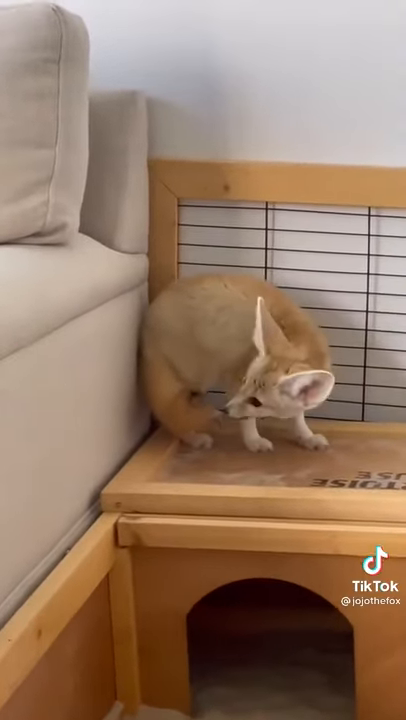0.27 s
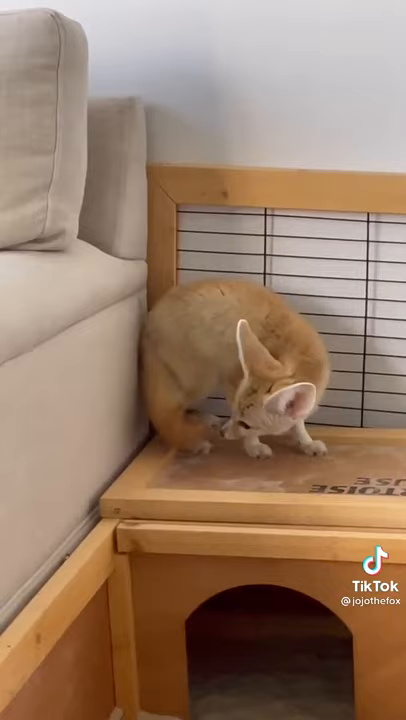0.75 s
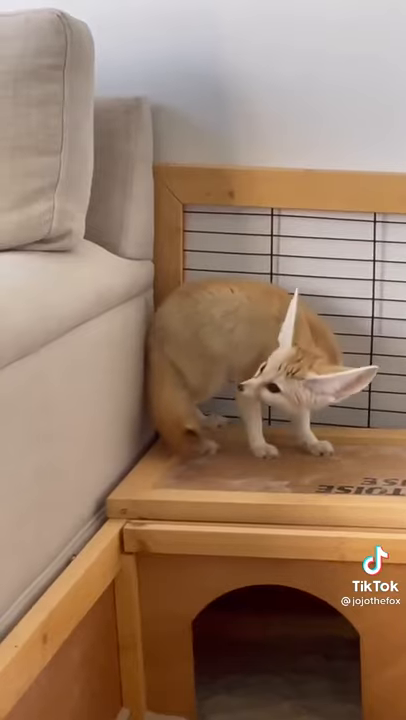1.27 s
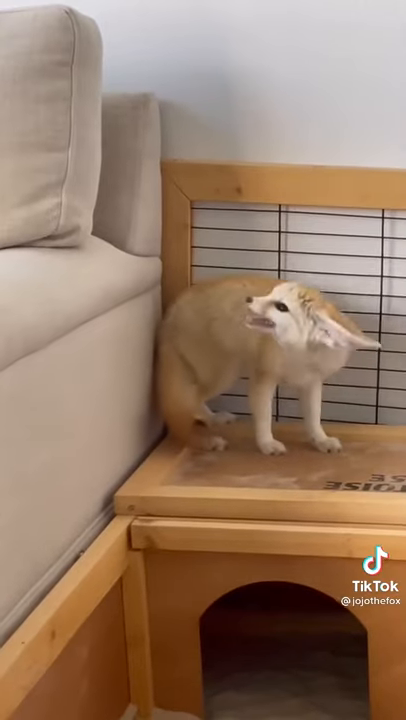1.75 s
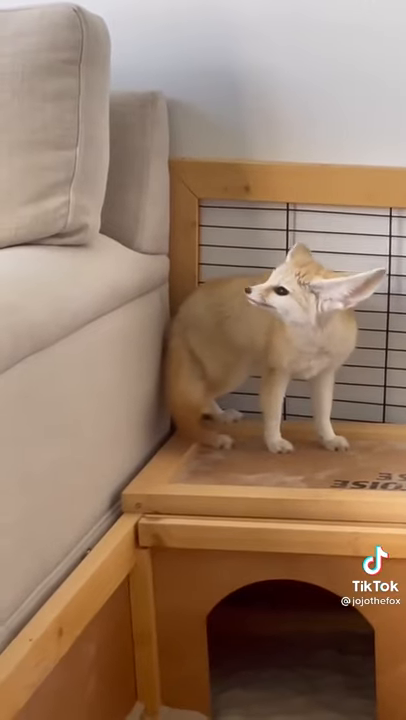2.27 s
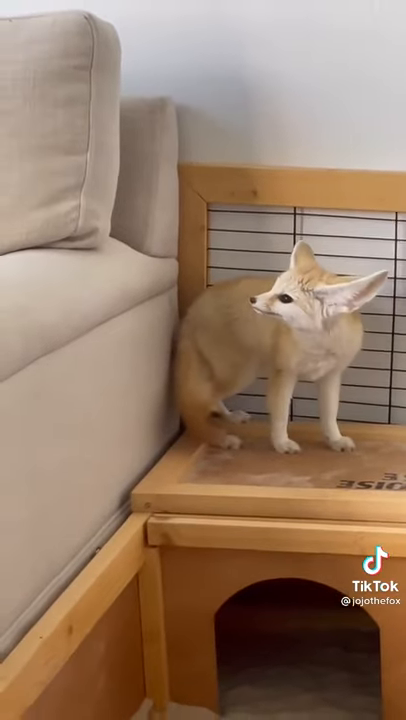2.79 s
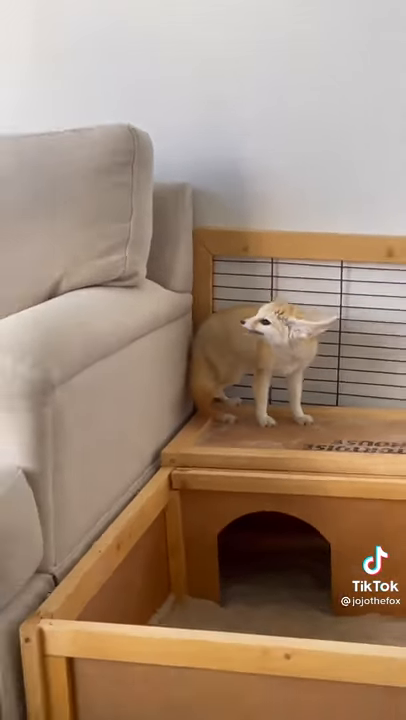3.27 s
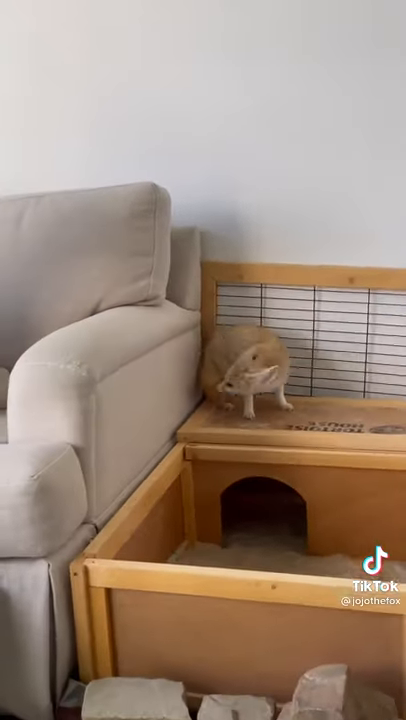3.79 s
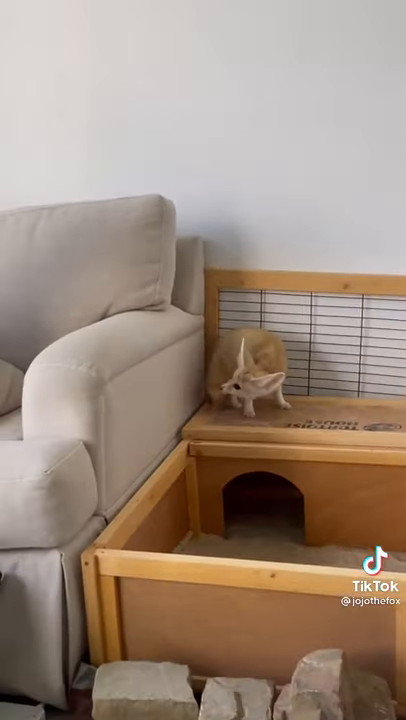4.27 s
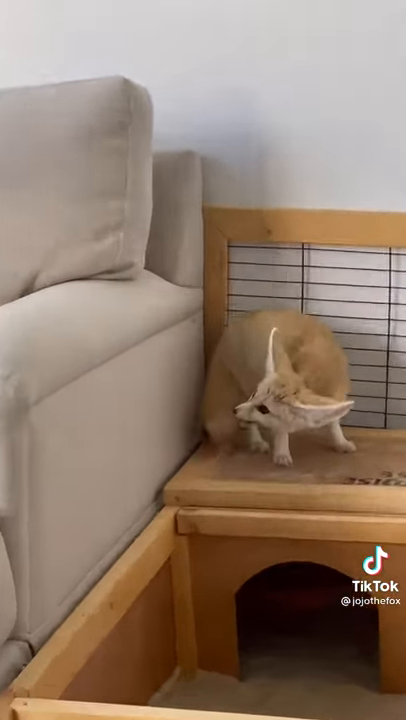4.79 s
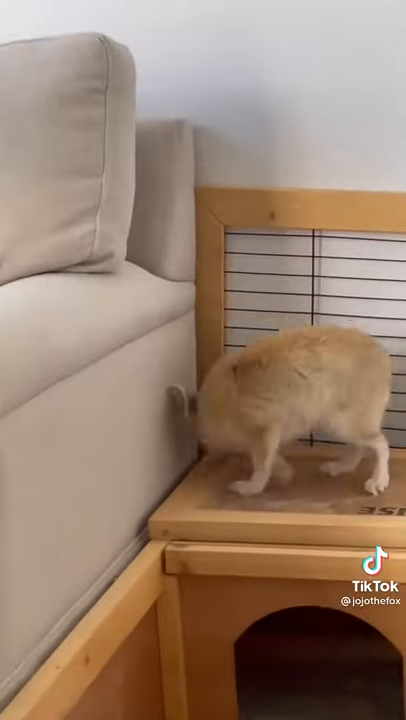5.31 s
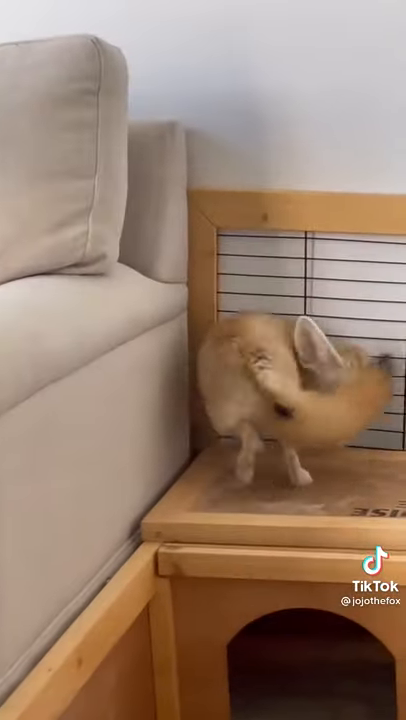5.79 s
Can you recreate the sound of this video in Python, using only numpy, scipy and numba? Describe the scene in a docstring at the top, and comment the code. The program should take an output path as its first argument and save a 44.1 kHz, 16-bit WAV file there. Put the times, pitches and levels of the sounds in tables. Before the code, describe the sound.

In a furnished living room, a small fox gives thin, closed-mouth whines that sink to a growl, then rises into a harsh screech. After a pause comes a much louder, rattling shriek, then a third hoarse one, a few soft paw thumps on a wooden lid, and wavering whines. A phone a metre or two away catches short room echo, low rumble and hum.

```python
"""Fennec fox on a hutch

In a living room a fennec fox on a wooden hutch whines, growls and breaks into three harsh screeches.
One larynx makes all of it: harmonics of the folds, nearly clean in the whines, jittered and roughened
in the screeches, where noisy slaps rattle the throat. Resonances stand for mouth, throat and hollow lid.
A phone with two microphone ports a metre or two away hears it with room echo, hum and low rumble."""
import sys
import numpy as np
from scipy import signal
from scipy.fft import rfft, irfft, next_fast_len
from scipy.io import wavfile
from scipy.ndimage import uniform_filter1d
from numba import njit

SR = 44100
rng = np.random.default_rng(int(sys.argv[2]) if len(sys.argv) > 2 else 0)


def unload_wav(signal):
    """Save mono or channel-first audio to the path in sys.argv[1] as 16-bit WAV at rate SR, clipped to [-1, 1]."""
    wavfile.write(
        sys.argv[1],
        SR,
        np.round(np.clip(np.atleast_2d(signal).T, -1, 1) * 32767).astype(np.int16),
    )


N = 266805
T = np.arange(N) / SR
TOP_HZ = 14800  # top of the phone's range
ATTACK_S, RELEASE_S = .012, .026  # sloped edges of a call


def undb(db):
    """Decibels to gain."""
    return 10 ** (np.asarray(db) / 20)


def unit(x):
    """Scale to rms 1."""
    return x / np.sqrt(np.mean(x ** 2))


def curves(rows):
    """Each column after the time column, interpolated to every sample."""
    s, *columns = np.transpose(rows)
    return [np.interp(T, s, c) for c in columns]


def noise():
    """White noise."""
    return rng.standard_normal(N)


def colour(x, points):
    """Filter by a spectrum of (Hz, dB) points, joined on a logarithmic frequency axis."""
    hz, db = np.transpose(points)
    size = next_fast_len(2 * N)
    f = np.maximum(np.fft.rfftfreq(size, 1 / SR), 1)
    gain = undb(np.interp(np.log(f), np.log(hz), db))
    return irfft(rfft(x, size) * gain, size)[:N]


def band(x, lo_hz, hi_hz):
    """Steep band-pass without delay."""
    sos = signal.butter(4, [lo_hz, min(hi_hz, .45 * SR)], "band", fs=SR, output="sos")
    return signal.sosfiltfilt(sos, x)


def ring(x, hz, width_hz):
    """One resonance, gain 1 at its centre."""
    return signal.lfilter(*signal.iirpeak(hz, hz / width_hz, fs=SR), x)


@njit
def glide(x, hz, width_hz):
    """A resonance whose centre moves, gain 1 at its centre."""
    y, band_state, low_state = np.empty(len(x)), 0., 0.
    for i in range(len(x)):
        g, damping = np.tan(np.pi * hz[i] / SR), width_hz / hz[i]
        v = (band_state + g * (x[i] - low_state)) / (1 + g * (g + damping))
        band_state = 2 * v - band_state
        low_state = low_state + 2 * g * v
        y[i] = damping * v
    return y


def wander(hz):
    """Random motion, mostly slower than hz, rms 1."""
    return unit(signal.sosfilt(signal.butter(2, hz, fs=SR, output="sos"), noise()))


def bump(s, spread_s):
    """A smooth bell-shaped swell centred on time s."""
    return np.exp(-.5 * np.minimum(((T - s) / spread_s) ** 2, 60))


def during(start, end, attack_s, release_s):
    """1 between start and end, with sloped edges."""
    return np.clip(np.minimum((T - start) / attack_s, (end - T) / release_s) + .7, 0, 1)


def per_call(calls, index):
    """One column of a table of calls, held through each call."""
    held = np.full(N, float(calls[0][index]))
    for row in calls:
        held[T > row[0] - 2 * ATTACK_S] = row[index]
    return uniform_filter1d(held, size=700)


def call_levels(calls, end_power):
    """Each call moves from start to crest to end: level in dB, on-off gate, time since its start."""
    level, gate, age = np.full(N, -100.), 0, np.zeros(N)
    for start, crest, end, start_db, crest_db, end_db, *_ in calls:
        to_crest = np.clip((T - start) / (crest - start), 0, 1)
        to_end = np.clip((T - crest) / (end - crest), 0, 1)
        call_db = start_db + (crest_db - start_db) * to_crest + (end_db - crest_db) * to_end ** end_power
        begun = T > start - 2 * ATTACK_S
        level = np.where(begun, call_db, level)
        age = np.where(begun, np.maximum(T - start, 0), age)
        gate = np.maximum(gate, during(start, end, ATTACK_S, RELEASE_S))
    return uniform_filter1d(level, size=500), gate, age


def ports(x):
    """The phone's body bends the sound on its way to the two microphone ports: a phase shift, half to each."""
    # phase by which the left port leads the right: freq_hz, phase_rad
    port_phase = [(250, 0), (700, .35), (1800, .05), (2600, .6), (4200, .85), (4550, 1.5), (4860, np.pi),
                  (5200, 5.3), (6300, 6.4), (8700, 9.2), (9500, 9.6), (11900, 12.5)]
    size = next_fast_len(N + 512)
    turn = np.exp(.5j * np.interp(np.fft.rfftfreq(size, 1 / SR), *np.transpose(port_phase)))
    return np.array([irfft(rfft(x, size) * h, size)[:N] for h in (turn, turn.conj())])


def house():
    """Low rumble, steady hum tones, a faint hiss and a narrow hiss that swells and fades: shaped noise and sines."""
    # spectrum of the low rumble: freq_hz, gain_db
    rumble_spectrum = [(15, -75), (25, -44), (51, -4.5), (75, -1), (128, -17.5), (146, -13), (180, -13.5),
                       (270, -22.5), (306, -22), (831, -36.5), (1170, -44.5), (2670, -46.5), (4000, -64),
                       (5200, -104), (8800, -120)]
    # spectrum of the hiss: freq_hz, gain_db
    hiss_spectrum = [(3000, -1), (4900, 0.5), (6500, 0), (9000, 0.5), (11300, 2.5), (13000, -18.5)]
    # mains and motor lines: freq_hz, rms_level_db
    hum_lines = [(60, -51.5), (76.5, -53.5), (120, -54.5), (178, -67.5)]
    # faint narrow hiss near 2.6 kHz that swells and fades: time_s, level_db
    mid_hiss_levels = [(0, -77), (1.2, -75), (2.2, -71.5), (2.6, -66.5), (3.1, -71.5), (4.0, -78), (6, -76)]
    rumble = unit(colour(noise(), rumble_spectrum)) * undb(-46 + 1.5 * wander(4.2))
    hiss = unit(band(colour(noise(), hiss_spectrum), 2700, 18000)) * undb(-84.5)
    mid_hiss_db, = curves(mid_hiss_levels)
    mid_hiss = unit(ring(band(noise(), 1000, 3280), 2570, 300)) * undb(mid_hiss_db)
    hum = 0
    for hz, db in hum_lines:
        hum = hum + undb(db) * np.sqrt(2) * np.sin(2 * np.pi * hz * T + .49 * wander(6.5))
    # noise of opposite sign at the two ports widens the background
    side = unit(band(noise(), 180, 2200)) * undb(-68)
    return ports(rumble + hum + hiss + mid_hiss) + np.array([side, -side])


def room(x, t60_s, treble_t60_s, wet_db):
    """Diffuse echo of a furnished room, different at each microphone port: decaying noise, treble sooner."""
    out = []
    for _ in range(2):
        low, high = band(noise(), 100, 4500), band(noise(), 4500, 15000)
        tail = low * np.exp(-np.log(1000) * T / t60_s) + high * np.exp(-np.log(1000) * T / treble_t60_s)
        # the tail sets in 3 ms after the direct sound and is cut at one second
        tail = (tail * np.clip((T - .003) / .00067, 0, 1))[:SR]
        out.append(signal.fftconvolve(x, tail / np.sqrt(np.sum(tail ** 2)))[:N])
    mid, side = out
    return undb(wet_db) * (ports(mid) + .34 * np.array([side, -side]))


def paws():
    """Soft steps thump the resonances of the hollow lid; claws and fur scrape it as coloured noise."""
    # paw steps, each pressing hardest 12 ms after its start: start_s, relative_level_db
    steps = [(4.424, -58), (5.158, -47.5), (5.185, -66), (5.272, -51.5), (5.508, -56.5), (5.736, -66),
             (5.835, -67)]
    # resonances of the hutch lid: freq_hz, width_hz, relative_gain_db
    lid_modes = [(128, 13.8, -23), (166.1, 9.3, 9), (239, 18.3, 4), (314.6, 38, -34), (615, 130, -37)]
    # scrapes: centre_s, spread_s, level_db
    scrapes = [(4.331, .03, -68.5), (4.42, 0.0023, -55), (4.428, 0.018, -59), (4.498, 0.0012, -65),
               (4.499, 0.006, -65)]
    # spectrum of the scrapes: freq_hz, gain_db
    scrape_spectrum = [(200, 3.5), (800, 11), (1500, -13), (3500, -13), (4900, -22.5), (6300, -10.5),
                       (8500, -22), (12000, -21.5), (14000, -37)]
    push = noise() * sum(undb(db) * bump(s + .012, .0054) for s, db in steps)
    thumps = 22 * sum(undb(db) * ring(push, hz, width) for hz, width, db in lid_modes)
    strokes = sum(undb(db) * bump(s, spread) for s, spread, db in scrapes)
    return thumps + unit(colour(noise(), scrape_spectrum)) * strokes


def overtones(phase, slope_db, patchy_db, count):
    """Harmonics of the vocal folds, tilted by slope_db an octave; each swells and fades on its own."""
    hz = np.gradient(phase) * SR / (2 * np.pi)
    out = 0
    for k in range(1, count + 1):
        gain = undb(slope_db * np.log2(k) + patchy_db * wander(16.7))
        out = out + gain * np.sin(k * phase) * (k * hz < TOP_HZ)
    return unit(out)


def project(voice, low_db, mid_db, top_db, waver_db):
    """Level out the low, middle and top registers, then give each its own level with a little waver."""
    registers = band(voice, 150, 2000), band(voice, 2000, 4800), band(voice, 4800, 16000)
    out = 0
    for part, db in zip(registers, (low_db, mid_db, top_db)):
        power = uniform_filter1d(uniform_filter1d(part ** 2, size=1600), size=1000)
        out = out + part / np.sqrt(np.abs(power) + 1e-12) * undb(db + waver_db * wander(8.9))
    return out


def whine():
    """A thin, nearly clean tone through a closed mouth; it sinks to a growl where the folds beat unevenly."""
    # pitch through each run of whines: time_s, pitch_hz
    pitch_runs = [
        [(.385, 665), (.445, 622), (.485, 695), (.56, 742), (.59, 660), (.625, 530)],
        [(.68, 515), (.79, 545.3), (.815, 580), (.84, 410), (.875, 348.5), (.995, 330), (1.015, 180),
         (1.1, 205), (1.185, 203)],
        [(1.205, 310.1), (1.265, 341), (1.295, 445), (1.325, 610), (1.36, 622), (1.455, 797)],
        [(5.16, 945), (5.18, 940), (5.215, 805), (5.27, 722), (5.3, 770), (5.39, 738), (5.48, 772),
         (5.495, 826.5), (5.596, 762), (5.622, 699.4), (5.69, 725.3), (5.744, 657), (5.778, 717.6),
         (5.808, 669.3), (6.01, 776.3), (6.05, 709.6)],
    ]
    # whines: start_s, crest_s, end_s, low register at start_db, crest_db, end_db,
    # middle_db and treble_db at the usual pitch, added roughness at the start (0-1)
    calls = [(.39, .49, 0.555, -54, -57, -56, -57.5, -80, .8),
             (.56, .595, .625, -55, -51, -56, -70, -92, 0), (.675, .73, .745, -60, -53, -53, -63, -82, .2),
             (.755, .79, .81, -51, -49, -50, -55, -72, .5),
             (.815, .875, 1.2, -50, -42.5, -66, -66, -88, .35),
             (1.205, 1.255, 1.47, -57, -47.5, -70, -85, -94, .1),
             (5.16, 5.18, 5.25, -44, -43.5, -55, -61, -68, 0),
             (5.255, 5.31, 5.68, -52, -42.5, -48, -60, -73, .05),
             (5.68, 5.74, 5.95, -50.5, -52.5, -53, -59, -63.5, .5),
             (5.975, 6.0, 6.16, -71, -66, -39, -57, -66.5, .5)]
    # hoarse grunts: centre_s, spread_s, resonance_hz, level_db
    grunt_rows = [(5.79, .015, 1190, -56), (5.844, .016, 1127, -49.5), (5.998, 0.022, 987, -45.5)]
    # nearly closed mouth: freq_hz, gain_db
    shut_mouth = [(180, -10), (350, -26), (600, -6.5), (800, -11), (1050, -5.5), (1500, 0), (2200, -13.5),
                  (3000, -14.5), (3700, -18.5), (4400, -16.5), (5400, -15.5), (7200, -7.5), (9000, -12),
                  (11300, 3.5), (13000, -49)]
    usual_hz, open_db_per_octave = 729, 18  # middle and treble grow as the pitch rises
    held_rough, growl_rough, grunt_rough = .065, .6, .4856
    catch_s = .027  # decay of the catch in the voice at the start
    growl_below_hz, growl_range_hz = 480, 199

    hz, = curves(np.vstack(pitch_runs))
    level, gate, age = call_levels(calls, end_power=.7)
    growl = np.clip((growl_below_hz - hz) / growl_range_hz, 0, 1)
    catch = per_call(calls, index=8) * np.exp(-age / catch_s)
    rough = held_rough + catch + growl_rough * growl
    rough = rough + grunt_rough * sum(bump(s, spread) for s, spread, *_ in grunt_rows)
    jitter = .00765 * wander(59) + .08 * rough * wander(223.4)
    phase = 2 * np.pi * np.cumsum(hz * (1 + jitter)) / SR
    folds = overtones(phase, slope_db=-2, patchy_db=5, count=18) + .8 * np.sin(2 * phase)
    # harmonics near these mouth resonances stand out
    folds = folds + .8 * ring(folds, 1680, 400) + .6 * ring(folds, 2750, 400)
    shimmer = 1 + .55 * rough * wander(220)
    # breath noise pulses with the folds
    rasp = noise() * (1 + np.cos(phase)) * (.043 + .37 * rough ** 2)
    voice = colour(folds * shimmer + rasp, shut_mouth)
    # the lips close as the pitch sinks, muffling the growl
    closed = np.clip((520 - hz) / 130, 0, 1)
    voice = voice + 4 * closed * ring(ring(voice, 795, 630), 790, 450)
    open_db = open_db_per_octave * np.log2(hz / usual_hz)
    middle_db = per_call(calls, index=6) + open_db
    treble_db = per_call(calls, index=7) + open_db
    voice = project(voice, level, middle_db, treble_db, waver_db=1)
    chest_tone = np.sin(phase) + .42 * np.sin(2 * phase)
    chest = undb(-52) * growl ** 2 * chest_tone * shimmer
    grunts = 0
    for s, spread, resonance_hz, db in grunt_rows:
        hoarse = unit(ring(ring(noise(), resonance_hz, 320), resonance_hz, 320))
        grunts = grunts + undb(db) * bump(s, spread) * hoarse
    return (voice + chest) * gate + grunts


def rattle():
    """Throat rattle: bursts of uneven slaps that quicken and, on the whole, weaken as they go."""
    # bursts: start_s, end_s, first_rate_per_s, strength_db
    bursts = [(3.335, 3.77, 52.5, 6), (4.879, 5.045, 54.8, 1)]
    rate_rise_per_s2, slap_spread_s = 12, .0015
    scatter_db, fade_db_per_s = 1, 4
    out = 0
    for start, end, rate, db in bursts:
        s = start
        for chance in rng.standard_normal(size=40):
            if s < end:
                slap_db = db + scatter_db * chance - fade_db_per_s * (s - start)
                out = out + undb(slap_db) * bump(s, slap_spread_s)
            s += 1 / (rate + rate_rise_per_s2 * (s - start))
    return out


def tight_throat(voice):
    """The tightened throat gathers the voice into three trembling, gliding bands and two fixed ones."""
    # throat in the second and third screeches: time_s, low_hz, middle_hz, high_hz, tightness (0-1)
    throat_shapes = [
        [(3.29, 1520, 2300, 4300, 0), (3.33, 1550, 2350, 4200, .5), (3.40, 1800, 2300, 3960, 1),
         (3.53, 1830, 2330, 3970, 1), (3.60, 1820, 2750, 3950, .8), (3.655, 1750, 2750, 3400, .9),
         (3.72, 1520, 2700, 3700, .8), (3.77, 1450, 2650, 3650, .6), (3.81, 1250, 2400, 3550, 0)],
        [(4.71, 1050, 2100, 3350, .3), (4.77, 1150, 2230, 3400, .6), (4.84, 1400, 2500, 3500, .6),
         (4.90, 1550, 2650, 3850, 1), (4.96, 1470, 2600, 3550, 1), (5.03, 1500, 2420, 3450, .8),
         (5.08, 1400, 2350, 3500, .5), (5.11, 1200, 2250, 3400, 0)],
    ]
    # the three gliding resonances, low to high: width_hz, gain
    throat_peaks = [(300, 1.6), (300, 1.1), (430, 2.1)]
    *centres, tightness = curves(np.vstack(throat_shapes))
    treble = .9 * ring(voice, 7250, 400)
    knock = 1.3 * ring(ring(voice, 1130, 170), 1130, 170)
    out = treble + knock
    for centre, (width_hz, gain) in zip(centres, throat_peaks):
        hz = centre * (1 + .022 * wander(70))
        out = out + gain * glide(glide(voice, hz, float(width_hz)), hz, float(width_hz))
    return tightness * out


def screech():
    """Overdriven folds jitter, a second oscillation adds side tones, and the throat rattles in noisy slaps."""
    # folds in each screech: time_s, pitch_hz before the opening yelp is added, roughness (0-1)
    pitch_runs = [
        [(1.465, 900, .35), (1.52, 876, 1), (1.545, 1350, .85), (1.585, 1420, .4), (1.635, 1230, .7),
         (1.68, 1400, .3), (1.77, 1460, .46), (1.82, 1540, .22), (1.865, 1400, .3), (1.91, 1290, .5),
         (1.97, 1110, .3)],
        [(3.14, 950, 0.81), (3.19, 931, 0.17), (3.243, 1081, 0.05), (3.256, 1450, .15), (3.29, 1560, .25),
         (3.32, 1500, .9), (3.5, 1896, .9), (3.62, 1755, .9), (3.69, 1438, 0.62), (3.79, 1290, .35),
         (3.82, 1130, .22), (3.865, 930, .25)],
        [(4.708, 850, 0.5), (4.77, 1040, .95), (4.84, 1200, 1), (4.89, 1400, .9), (5.0, 1270, .95),
         (5.05, 1190, 0.7), (5.095, 1160, 0.36), (5.12, 1055, 0.1), (5.147, 1055, .08), (5.158, 1220, .15)],
    ]
    # screeches: start_s, crest_s, end_s, middle register at start_db, crest_db, end_db,
    # treble at crest_db, low register at crest_db, hoot (0-1)
    calls = [(1.465, 1.58, 1.955, -76, -37.5, -42.5, -40, -40.5, 0.25),
             (3.143, 3.42, 3.862, -54.5, -28, -47.5, -29.5, -41.5, .1),
             (4.708, 4.92, 5.138, -43.5, -37, -46.5, -41.5, -42, 0.12)]
    # independent tone that breaks out: centre_s, spread_s, pitch_hz, relative_level_db
    second_tones = [(1.568, 0.011, 1722, 0.5), (1.61, 0.0056, 1670, -17), (1.674, 0.011, 1823, 2.5),
                    (1.758, 0.014, 1739, 0), (1.818, 0.012, 1729, 0.5), (1.895, 0.016, 1668, -7.5),
                    (3.32, 0.018, 2305, -4), (4.707, 0.005, 1270, 0), (4.735, 0.011, 1298, -4),
                    (4.93, 0.04, 1530, -5)]
    # wide-open mouth: freq_hz, gain_db
    open_mouth = [(500, -61), (850, -23.5), (1150, -9.5), (1650, 0), (2050, -3), (2400, -3.5), (3300, 1),
                  (3900, -4), (4450, -2.5), (5400, -7), (7400, -5.5), (9300, -5), (11000, -11.5),
                  (12200, -23.5), (15000, -48.5)]
    yelp_hz, yelp_s = 370, .022  # each screech starts with a yelp from above
    hoot_hz, hoot_fade_hz = 1220, 300  # below this pitch the fundamental stands out
    low_growth, treble_growth = .33, 1.36  # dB gained for each dB of effort

    hz, rough = curves(np.vstack(pitch_runs))
    level, gate, age = call_levels(calls, end_power=1.29)
    hz = hz + yelp_hz * np.exp(-age / yelp_s)
    jitter = .014 * wander(88.7) + .075 * rough * wander(349)
    phase = 2 * np.pi * np.cumsum(hz * (1 + jitter)) / SR
    # an unsteady flutter near 310 Hz modulates pitch and loudness, adding side tones
    flutter = 2 * np.pi * np.cumsum(310 * (1 + .23 * wander(100))) / SR
    phase = phase + .53 * rough * np.sin(flutter)
    # the second harmonic blooms as it crosses a mouth resonance
    bloom = .96 * np.exp(-((2 * hz - 2220) / 260) ** 2) * np.clip(1 - rough, 0, 1)
    folds = overtones(phase, slope_db=.5, patchy_db=5.5, count=10) + (.13 + bloom) * np.sin(2 * phase)
    folds = folds * (1 + rough * (.78 * np.cos(flutter) + .5 * wander(400)))
    # the second tone has its own overtones and beats with the folds
    clock = 2 * np.pi * np.cumsum(1 + .02853 * wander(220)) / SR
    for s, spread, f, db in second_tones:
        tone = np.sin(f * clock) * (1 + .18 * np.cos(phase))
        tone = tone + np.sin(2 * f * clock) + .14 * np.sin(4 * f * clock)
        folds = folds + undb(db) * bump(s, spread) * tone
    rasp = noise() * (1 + .5 * np.cos(phase)) * (1 + .7 * np.cos(flutter)) * (.09 + .6 * rough)
    slaps = rattle()
    voice = colour(folds * (1 + .6 * slaps) + rasp + 3 * slaps * noise(), open_mouth)
    hoot = per_call(calls, index=8) * np.clip((hoot_hz - hz) / hoot_fade_hz, 0, 1)
    voice = voice + hoot * np.sin(phase)
    # more effort brightens the voice: the treble grows faster than the low register
    effort = level - per_call(calls, index=4)
    low_db = per_call(calls, index=7) + low_growth * effort
    treble_db = per_call(calls, index=6) + treble_growth * effort
    return gate * project(voice + tight_throat(voice), low_db, level, treble_db, waver_db=.6)


def scene():
    """The fox and its paws, with close echoes, the room and the house."""
    # close echoes off the lid, wall and sofa: delay_s, gain
    echoes = [(.0011, 0.15), (.0031, -0.056), (.0058, .2)]
    fox = whine() + screech() + paws()
    near = fox + sum(gain * np.interp(T - delay, T, fox) for delay, gain in echoes)
    both = ports(near) + room(fox, t60_s=.4, treble_t60_s=.33, wet_db=-6.5)
    # the low middle leans to the left
    lean = .3 * band(both.mean(axis=0), 550, 1400)
    return both + np.array([lean, -lean]) + house()


def record(dry):
    """The phone cuts the top with a steep low-pass."""
    return signal.sosfilt(signal.ellip(8, .2, 70, TOP_HZ, fs=SR, output="sos"), dry)


dry = scene()
out = record(dry)
unload_wav(out)
```